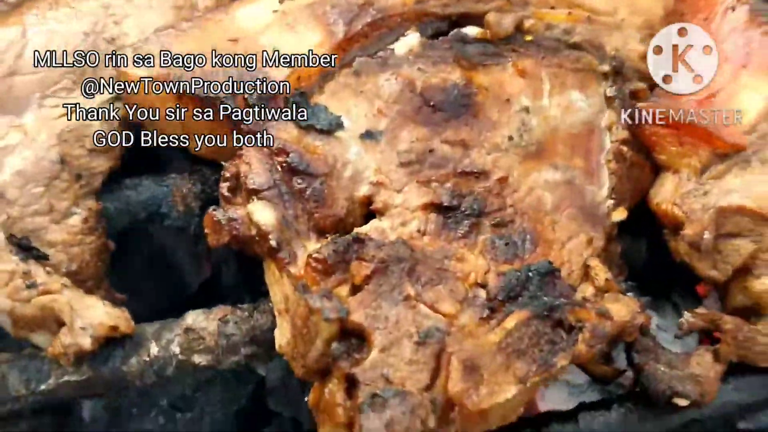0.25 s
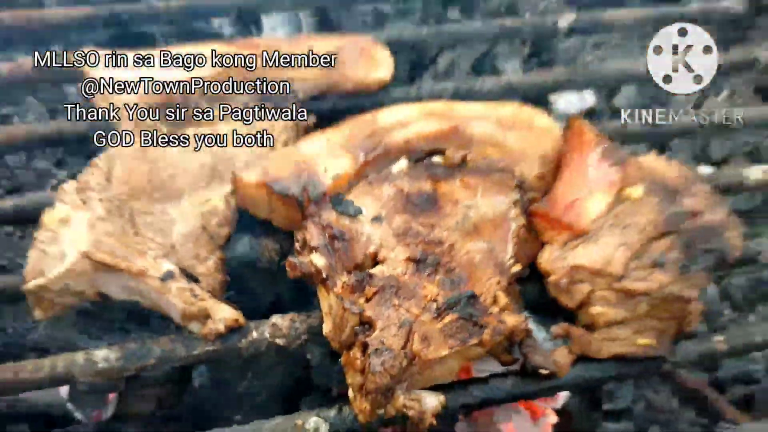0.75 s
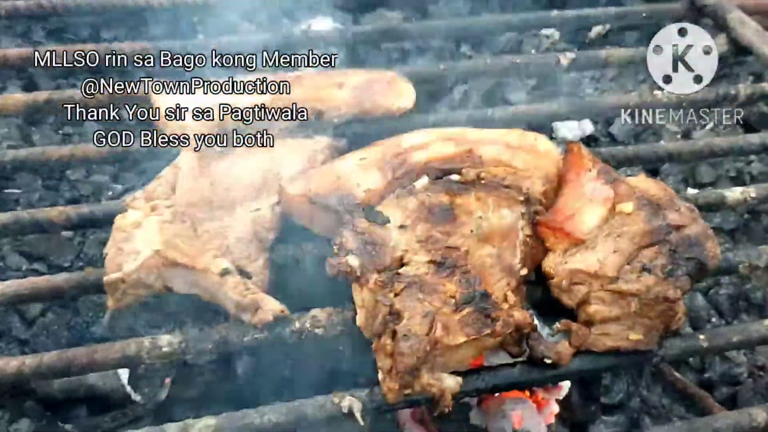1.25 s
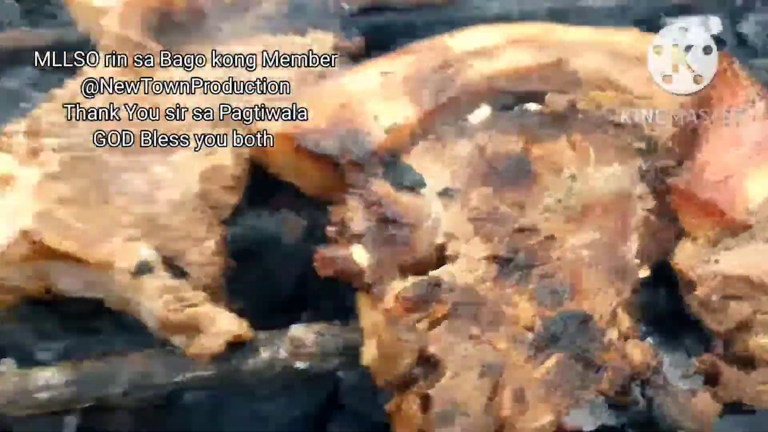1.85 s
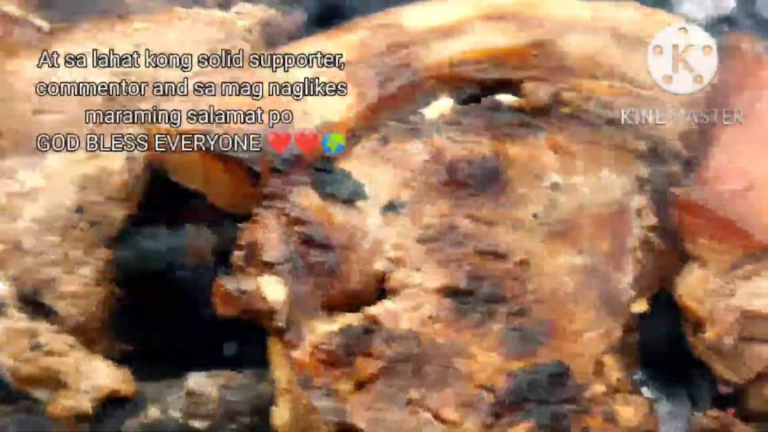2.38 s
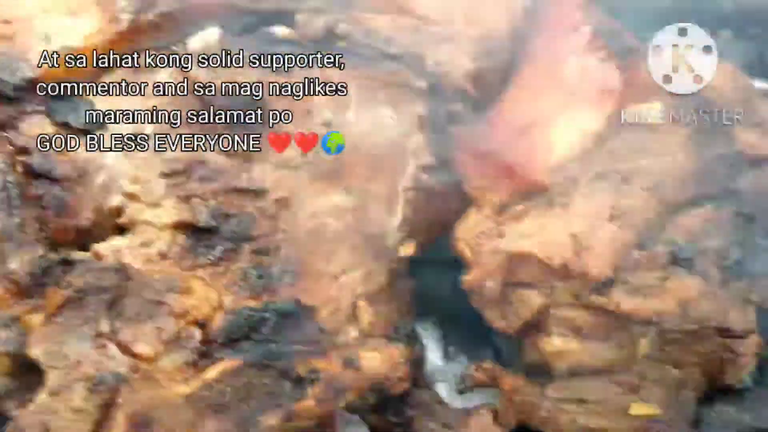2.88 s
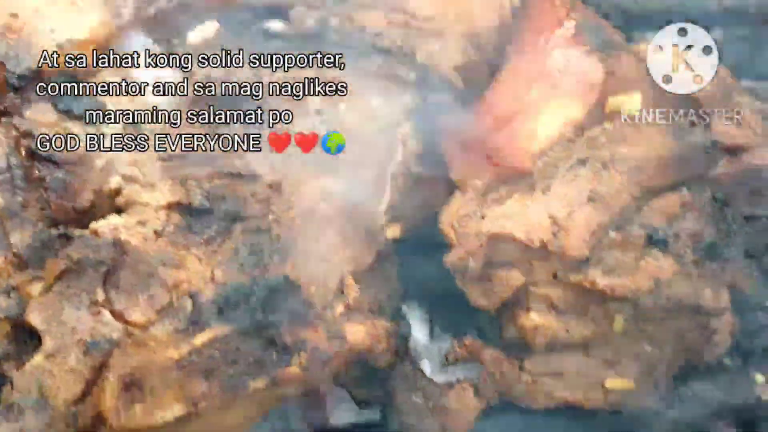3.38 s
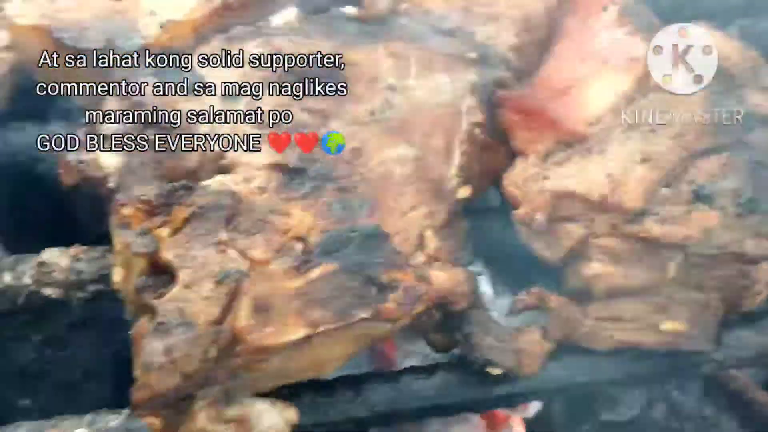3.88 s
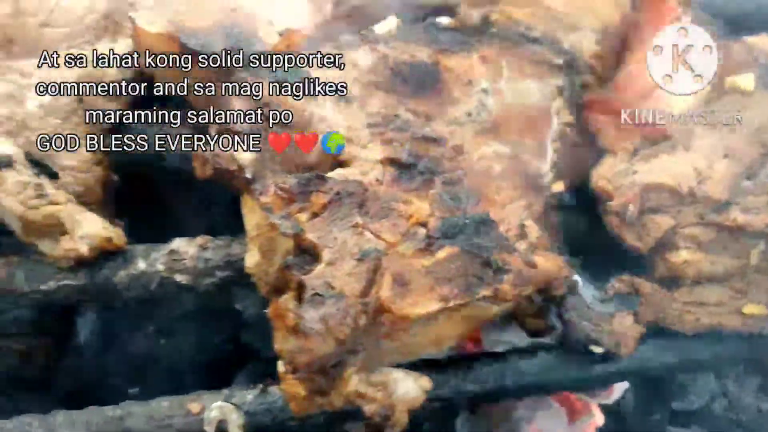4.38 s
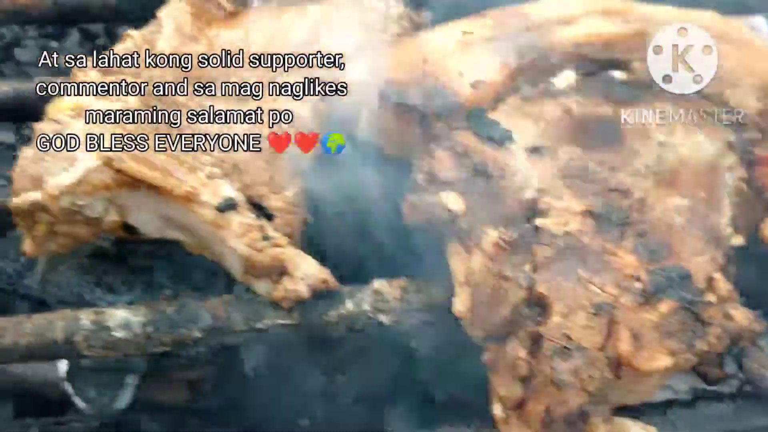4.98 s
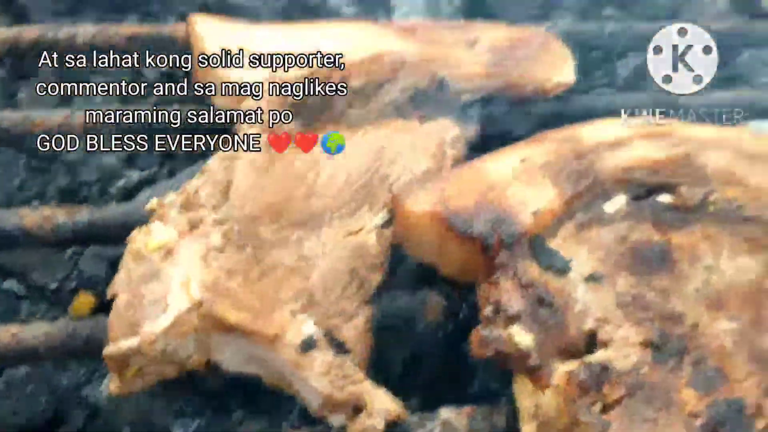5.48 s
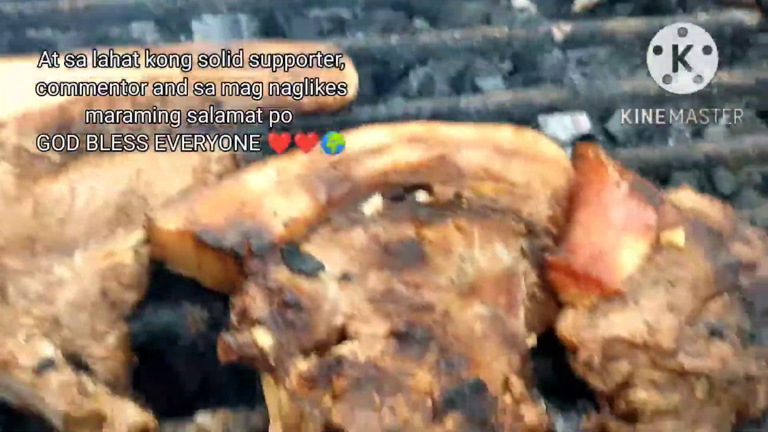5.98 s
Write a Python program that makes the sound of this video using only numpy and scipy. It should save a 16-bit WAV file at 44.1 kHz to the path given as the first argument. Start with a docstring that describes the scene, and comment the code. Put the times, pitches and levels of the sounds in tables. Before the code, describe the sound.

A close, hand-held phone hears meat frying over charcoal outdoors. Bright, grainy fizz made of tiny ticks runs throughout, above dull coal hiss and a quiet steady low rumble. A short fat spit opens at 0.03 s; at 0.3 s comes the loudest event, a hard thump on the phone with sharp snaps and a coal crack, then a softer bump at 0.6 s. The sizzle drops between about 1.2 and 1.6 s, with two very faint breathy clucks near 1.3 and 1.55 s. A dry crack and spit come at 1.6 s, another spit at 1.9 s. A distant hoarse rooster is faint around 1.5-2.6 s. Fizz builds to fullest near 3 s. A loud snap, hiss and coal crack strike at 3.7 s. Faint rooster notes return from 4.1 s; pops and small knocks cluster at 4.8-5 s, lesser spits follow at 5.15 and 5.3 s, and a last sharp pop sounds near 6 s.

```python
"""Fat fizzes on pork chops over charcoal outdoors, with a low rumble behind and a hand-held phone close by.
The fizz is random tiny clicks through a filter; larger bubbles snap as short bursts of shaped noise.
Flaring fat, spitting drips and two breathy clucks are clouds of tiny clicks; pushes on the phone and
splitting coals ring a few fading tones. Roosters crow faintly far away: gliding notes of five harmonics."""
import sys
import numpy as np
from scipy import signal
from scipy.fft import rfft, irfft, next_fast_len
from scipy.io import wavfile

SR = 44100
rng = np.random.default_rng(int(sys.argv[2]) if len(sys.argv) > 2 else 0)


def log_audio(samples):
    """Write samples as a 16-bit WAV file to the path given in sys.argv[1]."""
    # one column per channel
    frames = np.atleast_2d(samples).T
    # limit to full scale, then quantise
    limited = np.clip(frames, -1, 1)
    pcm = np.round(limited * 32767).astype(np.int16)
    wavfile.write(sys.argv[1], SR, pcm)


N = 275602  # length of the scene in samples


def gain_of(db):
    """Turns decibels into an amplitude factor."""
    return 10 ** (np.asarray(db) / 20)


def evened(x):
    """Scales a signal to an average strength (rms) of 1."""
    return x / np.sqrt(np.mean(x ** 2) + 1e-20)


def read(points, hz):
    """Reads a level in dB off a spectrum table, on a log-frequency axis."""
    f, db = np.transpose(points)
    return np.interp(np.log(hz + 1), np.log(f), db)


def add(mix, s, sound):
    """Adds a sound to the mix at time s, trimming what falls outside."""
    start = round(s * SR)
    sound = sound[max(-start, 0):]
    part = mix[max(start, 0):][:len(sound)]
    part += sound[:len(part)]


def click(points, size=4096):
    """Makes a click with a given spectrum and energy 1 that starts at once, with nothing before it."""
    level_db = read(points, abs(np.fft.fftfreq(size, 1 / SR)))
    log_gain = np.log(gain_of(level_db))
    # the Hilbert transform finds the phase that puts all the sound after the start
    spectrum = np.exp(np.conj(signal.hilbert(log_gain)))
    h = np.fft.ifft(spectrum).real[:size // 2]
    return h / np.linalg.norm(h)


def coloured(x, points):
    """Filters a signal with a spectrum table and scales it to rms 1."""
    return evened(signal.oaconvolve(x, click(points))[:len(x)])


def wander(size, rate):
    """Smooth random drift of about rms 1; its changes fade out above roughly `rate` Hz."""
    span = next_fast_len(max(size, SR))
    hz = np.fft.rfftfreq(span, 1 / SR)
    spectrum = rfft(rng.standard_normal(span)) * np.exp(-(hz / rate) ** 2)
    return evened(irfft(spectrum, span))[:size]


def bursts(size, per_s, spread_db):
    """Random one-sample clicks, at rms 1 overall; a wider spread makes a few stand out from the rest."""
    height = gain_of(spread_db * np.minimum(rng.exponential(1, size), 4.3))
    sign = rng.choice([-1, 1], size)
    happens = rng.random(size) < per_s / SR
    return evened(height * sign * happens)


# colour of a snapping bubble centred near 8200 Hz: (f/Hz, level/dB per Hz)
SNAP_COLOUR = [(300, -36), (1500, -34.5), (3500, -32), (5400, -22), (6400, -12), (7400, -2.5), (8700, 1),
               (9700, -7.5), (11000, -24.5), (13000, -24.5), (15500, -35)]


def tick(hz, ring_s=0.0023, scatter=0.038, tear_s=0.00052):
    """A bubble's skin tears in one sharp tick, scattered at once by the meat and the bars; energy 1."""
    t = np.arange(SR // 100) / SR
    tear = rng.standard_normal(len(t)) * t / tear_s * np.exp(1 - t / tear_s)
    echoes = scatter * rng.standard_normal(len(t)) * np.exp(-t / ring_s)
    shifted_colour = [(f * hz / 8200, db) for f, db in SNAP_COLOUR]
    sound = np.convolve(tear + echoes, click(shifted_colour, size=512))
    return sound / np.linalg.norm(sound)


# base levels of the frying over time: (t/s, level/dB of the fizz, level/dB of the coals' duller hiss)
FRYING_LEVELS = [(0.0, -64.5, -78), (0.52, -60.5, -79.5), (0.71, -65, -80.5), (1.27, -75, -84.5),
                 (1.56, -74, -82), (1.76, -68.5, -78), (2.07, -69, -78.5), (2.87, -62.5, -80.5),
                 (3.13, -60.5, -75.5), (3.51, -63.5, -79), (3.9, -61, -76), (4.61, -66, -79.5),
                 (4.84, -65.5, -77.5), (5.48, -66, -82), (5.85, -66.5, -82.5), (6.25, -67, -79.5)]
# colour of the fizz: (f/Hz, level/dB per Hz)
FIZZ_COLOUR = [(2500, -43.5), (4800, -22), (5800, -20), (6600, -14), (7400, -0.5), (7900, -4.5), (8700, 3),
               (9600, -6), (10500, -12), (11500, -19.5), (13500, -25), (15800, -30.5)]
# colour of the coals' hiss: (f/Hz, level/dB per Hz)
EMBERS_COLOUR = [(300, -10), (650, 5), (1000, 1), (1700, -2), (2500, -2), (3200, 0), (3700, 0), (4000, 1.5),
                 (4400, -6), (5200, -1.5), (7000, -16)]
# added to the base levels: tiny bubbles, ticking bubbles, coals (dB)
FINE_DB, COARSE_DB, EMBERS_DB = -1, -5.5, 0.5


def frying():
    """Thousands of tiny bubbles burst on the meat, over the smoother hiss of the coals."""
    s, fizz_db, embers_db = np.transpose(FRYING_LEVELS)
    t = np.arange(N) / SR
    fine_db = FINE_DB + 1.9 * wander(N, rate=51) + .6 * wander(N, rate=12)
    fine = coloured(bursts(N, per_s=2100, spread_db=3.5), FIZZ_COLOUR) * gain_of(fine_db)
    # larger bubbles tick one by one, each size at its own pitch
    kinds = []
    for hz in np.linspace(8000, 8700, num=16):
        kinds.append(signal.oaconvolve(bursts(N, per_s=10, spread_db=7.0), tick(hz))[:N])
    coarse = evened(sum(kinds)) * gain_of(COARSE_DB + 1.3 * wander(N, rate=7.8))
    embers = coloured(bursts(N, per_s=1700, spread_db=1), EMBERS_COLOUR)
    embers = embers * gain_of(EMBERS_DB + 1.0 * wander(N, rate=19))
    fizz = (fine + coarse) * gain_of(np.interp(t, s, fizz_db))
    return fizz + embers * gain_of(np.interp(t, s, embers_db))


# colour of the low rumble: (f/Hz, level/dB per Hz)
RUMBLE_COLOUR = [(25, -16.5), (50, -19.5), (80, -8), (120, -6.5), (168, 2.5), (215, -7), (290, -15.5),
                 (450, -18.5), (800, -36), (2000, -60)]


def low_rumble(level_db=-74.5):
    """A steady rumble: random noise filtered to its low pitches."""
    return gain_of(level_db) * coloured(rng.standard_normal(N), RUMBLE_COLOUR)


# registers of a noisy puff, from thud through knock, crack and rasp to hiss:
# (low edge f/Hz, high edge f/Hz, level/dB in a short puff, level/dB in a flare)
PUFF_REGISTERS = [(180, 640, -8, -21), (720, 1550, 0, -21.5), (1769, 2280, -5, -26),
                  (2760, 4405, -1.5, -15.5), (6600, 9960, 0.5, -0.5)]


def puff(s, rise, fall, levels_db, spill_db=-13, spill_hz=4600, pulse_hz=150, uneven_db=3.0, blunt=0.12):
    """A cloud of tiny clicks swells and dies, as when fat flashes to steam; gives start time and sound."""
    t = np.arange(-4 * rise, 6 * fall, 1 / SR)
    distance = np.where(t < 0, t / rise, t / fall)
    swell = np.exp(blunt - np.hypot(distance, blunt))  # rounded at the top
    sputter = gain_of(uneven_db * wander(SR // 2, rate=pulse_hz))  # it comes in fits
    cracks = swell * np.resize(sputter * bursts(SR // 2, per_s=9000, spread_db=0.0), len(t))
    sound = np.zeros(len(t))
    for (low, high, *_), db in zip(PUFF_REGISTERS, levels_db):
        edges = np.clip([low, high], 20, SR / 2 - 100)
        band = signal.butter(3, edges, "band", fs=SR, output="sos")
        sound += gain_of(db) * evened(signal.sosfilt(band, cracks))
    # the clicks also spill over the whole treble
    treble = signal.butter(2, spill_hz, "high", fs=SR, output="sos")
    sound += gain_of(levels_db[-1] + spill_db) * evened(signal.sosfilt(treble, cracks))
    return s + t[0], sound * np.sqrt(np.mean(swell ** 2))


# fat running onto hot metal: (t/s of the peak, base level/dB, rise t/s, fall t/s)
FLARE_UPS = [(0.026, -41, 0.0083, 0.018), (2.307, -61.5, 0.0028, .03), (2.425, -59, 0.023, 0.022),
             (3.043, -53.5, 0.0034, 0.041), (3.691, -41.5, 0.018, 0.024), (4.912, -44.5, 0.012, 0.012),
             (5.149, -56, 0.0022, .009), (5.982, -49, 0.0066, 0.0094)]


def flares():
    """Fat meets a hot bar and hisses for a moment."""
    out = np.zeros(N)
    *_, colour_db = np.transpose(PUFF_REGISTERS)
    for s, db, rise, fall in FLARE_UPS:
        add(out, *puff(s, rise, fall, db + colour_db))
    return out


# the loudest fat bubbles: (t/s, level/dB over the first millisecond, centre f/Hz)
BUBBLE_SNAPS = [(0.022, -29.5, 7730), (0.037, -48, 8650), (0.285, -44.5, 8150), (0.3117, -20, 9200),
                (0.328, -24, 8000), (0.4742, -46.5, 7820), (0.61, -47, 7920), (0.7022, -39.5, 8020),
                (0.8829, -44, 8000), (0.9794, -38, 7100), (1.2579, -42, 7960), (1.9078, -40.5, 7790),
                (2.3035, -38.5, 8400), (2.396, -41.5, 7940), (3.5005, -34.5, 8000), (3.6741, -20.5, 8130),
                (3.9335, -48, 9000), (4.0014, -43.5, 8500), (4.0624, -48, 8830), (4.0851, -47, 7920),
                (4.2657, -46.5, 8670), (4.304, -43.5, 8600), (4.3276, -46.5, 8690), (4.532, -48, 8190),
                (4.7675, -51.5, 8190), (4.9025, -27, 8330), (4.9086, -27.5, 7760), (5.1453, -40.5, 8360),
                (5.976, -38, 8800), (5.9818, -30, 8370)]


def snaps():
    """The largest bubbles of fat tear, one sharp tick each."""
    out = np.zeros(N)
    for s, db, hz in BUBBLE_SNAPS:
        # a tick has energy 1; the root spreads its level over one millisecond
        add(out, s, gain_of(db) * np.sqrt(SR / 1000) * tick(hz))
    return out


# pushes on the phone: (t/s, peak level/dB before the bass cut, contact t/s, release level/dB against the push)
PHONE_BUMPS = [(0.046, -45, 0.0043, -9), (0.3202, -6.5, 0.00053, -5.5), (0.3243, -14.5, 0.0021, -15),
               (0.615, -29, 0.0065, -7), (.6258, -29, 0.0018, -18.5), (2.757, -58, .005, -4),
               (4.8208, -44, 0.00068, -12), (4.984, -49.5, .001, -6), (6.206, -65, 0.0064, -6)]
# ringing tones of the phone's case: (f/Hz, level/dB, t/s to fade by 60 dB)
CASE_MODES = [(98, 4, 0.055), (218, 1, 0.026), (445, 3, 0.026), (760, -7, 0.017), (1250, -11, .009)]
HOLD_S, LOW_CUT_HZ = .0124, 60  # a push lets go after this time (s); the case weakens deeper sound (Hz)


def bumps():
    """Each push and its release ring the damped case; a longer contact gives a duller thump."""
    out, t = np.zeros(N), np.arange(SR // 8) / SR
    ring = sum(gain_of(db - 60 * t / t60) * np.cos(2 * np.pi * hz * t) for hz, db, t60 in CASE_MODES)
    for s, db, contact, release_db in PHONE_BUMPS:
        push = np.sin(np.pi * np.minimum(t / contact, 1)) ** 2
        thump = signal.fftconvolve(push, ring)[:len(t)]
        thump = gain_of(db) * thump / abs(thump).max()
        add(out, s, thump)
        add(out, s + HOLD_S, -gain_of(release_db) * thump)
    return signal.sosfiltfilt(signal.butter(4, LOW_CUT_HZ, "high", fs=SR, output="sos"), out)


# short noisy puffs: mostly drips spitting in the coals, two of them (1.324 and 1.549 s) breathy clucks
# of the distant birds: (t/s of the peak, base level/dB, rise t/s, fall t/s,
# brightness level/dB per octave, hollowness level/dB)
SHORT_PUFFS = [(0.11, -67, 0.0069, .011, .7, -2.5), (0.329, -31.5, 0.004, 0.0018, -5.5, 4),
               (0.412, -66.5, 0.0066, 0.0082, 0, 4), (0.688, -63, 0.0086, 0.013, -1.5, 1.5),
               (0.891, -73.5, 0.0081, 0.011, 6, 1), (0.984, -65.5, 0.0031, .012, 7.5, 3),
               (1.324, -73.5, 0.01, 0.017, -3, 2.5), (1.549, -73, 0.0053, 0.014, -2, -1.5),
               (1.612, -45, 0.0038, 0.008, 0, -1.5), (1.915, -48.5, .0056, 0.0088, 3, -6.5),
               (2.512, -59.5, 0.0062, .01, .5, 11), (2.845, -71.5, .012, 0.0081, 2.5, 4),
               (3.151, -59.5, 0.011, 0.0051, 0, -5), (3.675, -39.5, 0.002, 0.00077, 2.5, 0.5),
               (3.762, -59, 0.0027, 0.0074, 2, -8), (3.921, -69, 0.0037, .0046, -2.5, 1),
               (4.053, -71.5, 0.013, 0.01, 0.5, 1), (4.36, -70.5, 0.013, 0.0098, 2.5, 3),
               (4.682, -66, 0.015, 0.012, 2, -7), (4.821, -56, 0.014, 0.017, -2, 16),
               (4.986, -49.5, 0.0022, 0.011, -4, 24), (5.312, -60.5, .0035, 0.0072, 0, 0)]
# brightness tilts the spectrum about this pitch (Hz); hollowness dips it there, this wide (octaves)
PIVOT_HZ, HOLLOW_OCTAVES = 2000, 0.63


def spits_and_clucks():
    """Spitting drips and two breathy clucks share one colour, tilted darker or brighter and hollowed."""
    out = np.zeros(N)
    low, high, colour_db, _ = np.transpose(PUFF_REGISTERS)
    octaves = np.log2(np.sqrt(low * high) / PIVOT_HZ)
    dip = np.exp(-(octaves / HOLLOW_OCTAVES) ** 2)  # a negative hollowness makes this a bump
    for s, db, rise, fall, brightness, hollow_db in SHORT_PUFFS:
        levels_db = db + colour_db + brightness * octaves - hollow_db * dip
        add(out, *puff(s, rise, fall, levels_db))
    return out


# charcoal splitting: (t/s, peak level/dB of the first crack's ring, factor on every pitch)
COAL_SPLITS = [(.3281, -12, .97), (1.611, -33, 0.76), (2.5102, -46, 0.94), (3.6741, -31, 1.74),
               (3.7585, -46.5, 0.89), (4.8204, -38.5, 1), (4.9828, -43, 1.05), (4.9965, -48, 0.98),
               (5.3107, -46.5, 0.95)]
# ringing tones of a lump at factor 1: (f/Hz, level/dB, t/s to fade by 60 dB)
LUMP_MODES = [(733, -5, 0.018), (1230, -5, 0.015), (3130, -7.5, 0.005), (3390, 3.5, 0.017),
              (3850, -4, 0.03)]


def splits(crumble_db=-5, crumble_s=0.0027):
    """A lump cracks in the heat, crumbles a little and rings briefly, like dry wood."""
    out, t = np.zeros(N), np.arange(SR // 16) / SR
    for s, peak_db, size in COAL_SPLITS:
        ring = np.zeros(len(t))
        for hz, db, t60 in LUMP_MODES:
            ring += gain_of(db - 60 * t / t60) * np.sin(2 * np.pi * hz * size * t)
        crumbs = bursts(len(t), per_s=3600, spread_db=1.5) * np.exp(-t / crumble_s)
        # one sharp crack at the start, then the crumbs
        force = (t == 0) + gain_of(crumble_db) * crumbs / np.linalg.norm(crumbs)
        add(out, s, gain_of(peak_db) * signal.fftconvolve(force, ring) / abs(ring).max())
    return out


# notes of distant roosters: (start t/s, length t/s, pitch f/Hz at mid-note before the shake,
# level/dB before arch and flutter, glide f/Hz per s before the sag)
ROOSTER_NOTES = [(1.51, 0.095, 996, -81, 1.5), (1.6, 0.5, 1003, -81.5, -6.5),
                 (1.803, 0.091, 1022, -64.5, 97), (2.109, .53, 862, -78, -44.5),
                 (4.118, 0.18, 743, -80, -5), (4.647, 0.29, 730, -82.5, -87), (4.929, .6, 936, -86.5, 18.5)]
# how the throat colours each harmonic: (f/Hz, level/dB)
THROAT_COLOUR = [(700, 1), (1000, -7.5), (1400, -16), (1700, 4), (2200, -0.5), (2600, -7), (2950, -29),
                 (3600, -27), (4100, -15), (5200, -61)]
ARCH, SWELL = 0.029, 1.3  # pitch sags by this share at a note's ends; level follows the arch to this power
HOARSE = .011  # rough share by which the pitch shakes


def roosters(flutter_db=4.0):
    """Hoarse notes that arch in pitch and level and flutter on their long way across the yard."""
    out = np.zeros(N)
    for s, length, pitch, db, glide in ROOSTER_NOTES:
        t = np.arange(0, length, 1 / SR)
        arch = np.sin(np.pi * t / length)
        bend = 1 - ARCH * (1 - arch) + HOARSE * wander(len(t), rate=155)
        hz = (pitch + glide * (t - length / 2)) * bend
        phase = 2 * np.pi * np.cumsum(hz) / SR
        voice = sum(gain_of(read(THROAT_COLOUR, k * hz)) * np.sin(k * phase) for k in range(1, 6))
        level = gain_of(db + flutter_db * wander(len(t), rate=33))
        add(out, s, evened(voice) * arch ** SWELL * level)
    return out


def echo(x, t60, level_db):
    """A diffuse scatter: random reflections that start after 1 ms and fade by 60 dB in t60 seconds."""
    t = np.arange(SR) / SR
    tail = rng.standard_normal(len(t)) * gain_of(-60 * t / t60) * (t > .001)
    return gain_of(level_db) * signal.oaconvolve(x, tail / np.linalg.norm(tail))[:N]


def scene():
    """The grill with its fire box, the handling and the yard."""
    # the two clucks share the short echo of the pops
    pops = flares() + snaps() + spits_and_clucks() + splits()
    crows = roosters()
    fire_box = echo(pops, t60=.09, level_db=-13)
    yard = echo(crows, t60=0.76, level_db=-8)
    return (frying() + low_rumble() + pops + fire_box + bumps() + crows + yard)[None]


def record(dry, low_hz=52, edge_hz=15900):
    """The phone cuts the deepest bass and the highest treble."""
    cut = signal.sosfilt(signal.butter(4, low_hz, "high", fs=SR, output="sos"), dry)
    treble_cut = signal.firwin(511, edge_hz, window=("kaiser", 9), fs=SR)
    return signal.oaconvolve(cut, treble_cut[None], "same")


dry = scene()
out = record(dry)
log_audio(out)
```